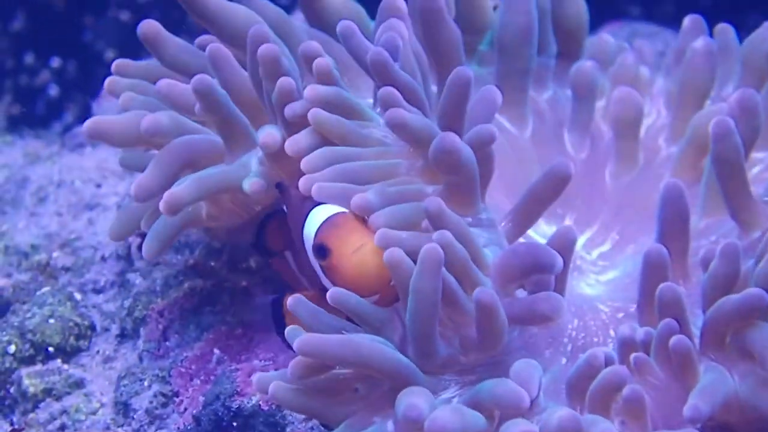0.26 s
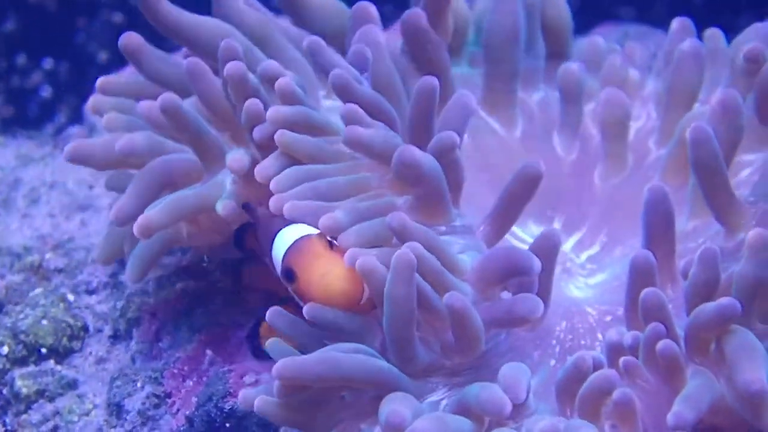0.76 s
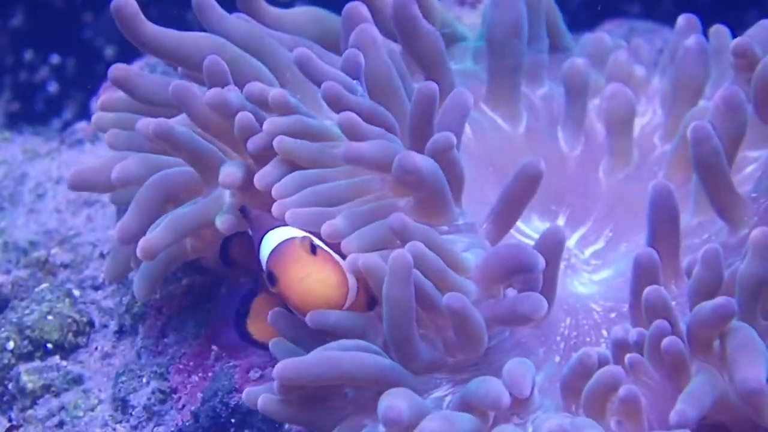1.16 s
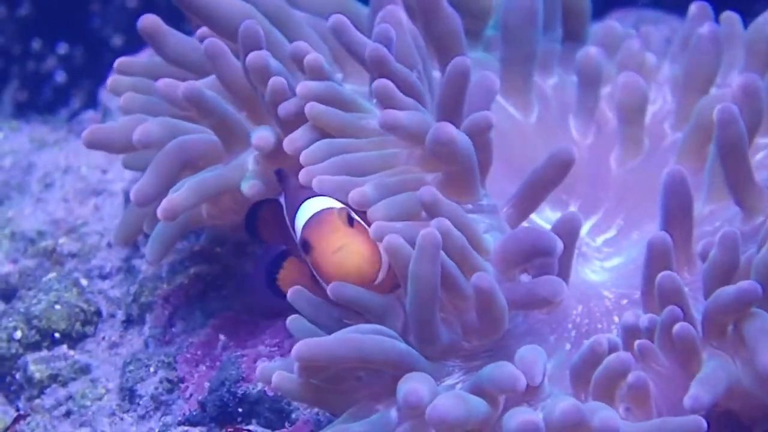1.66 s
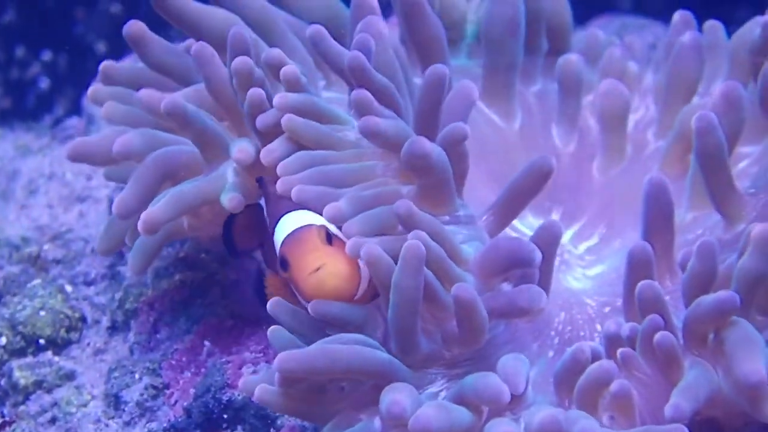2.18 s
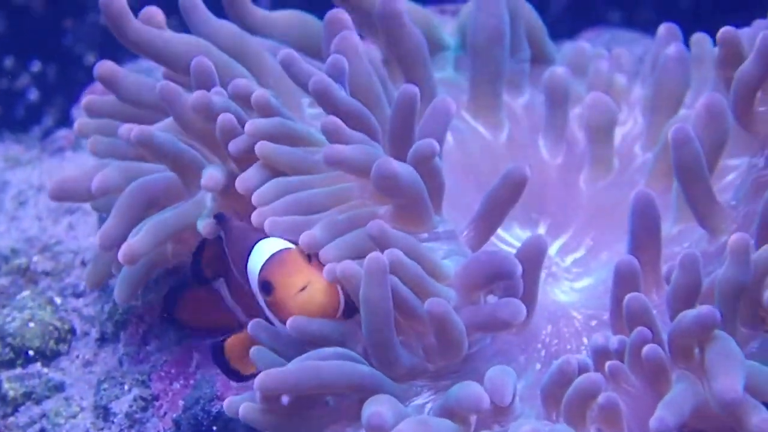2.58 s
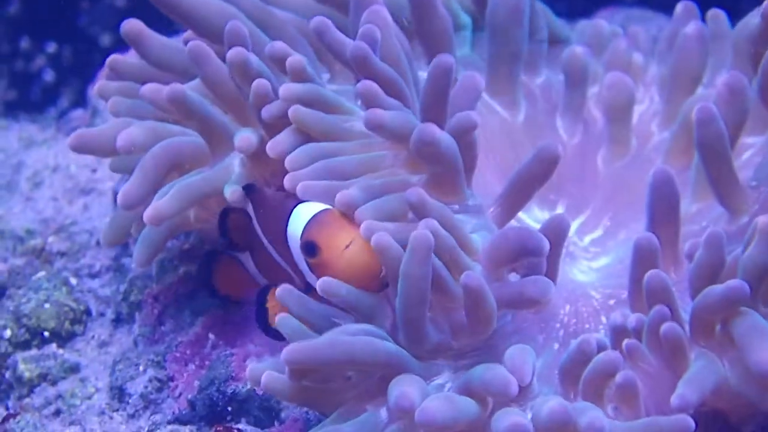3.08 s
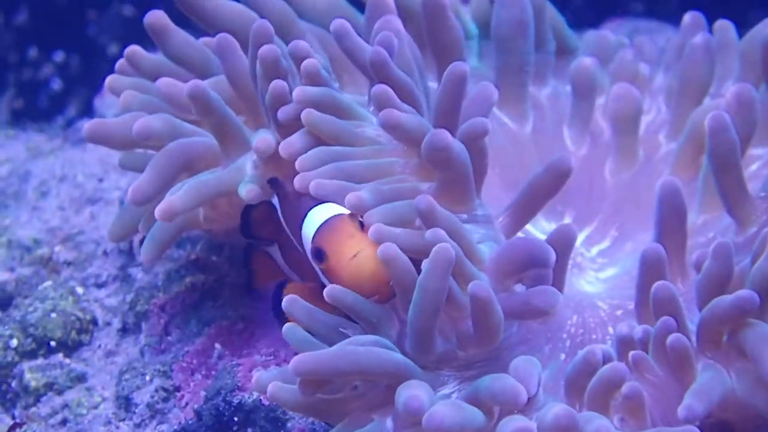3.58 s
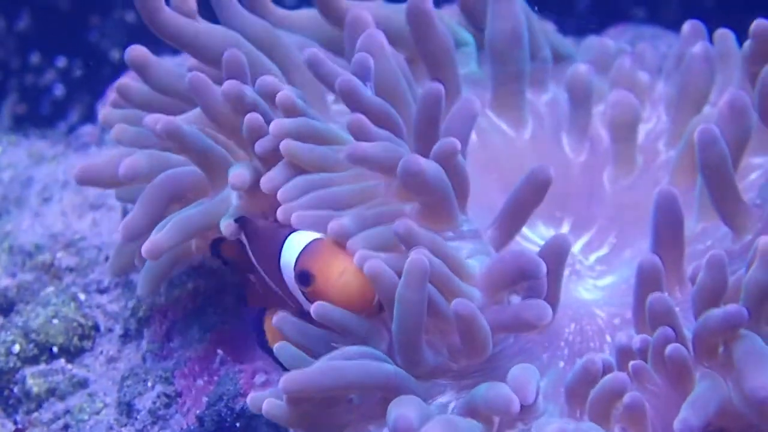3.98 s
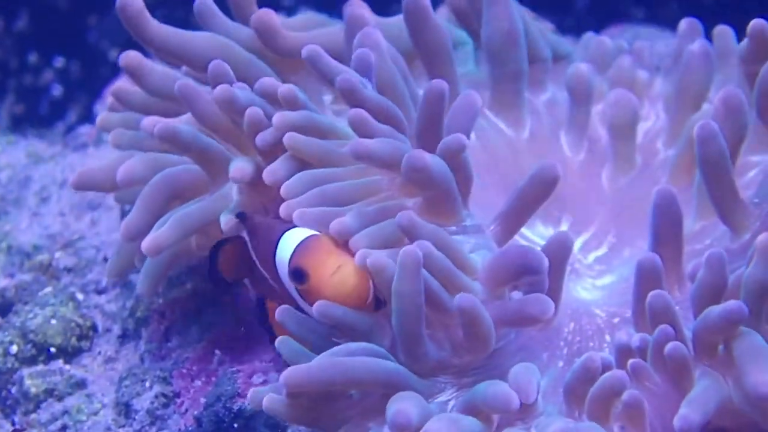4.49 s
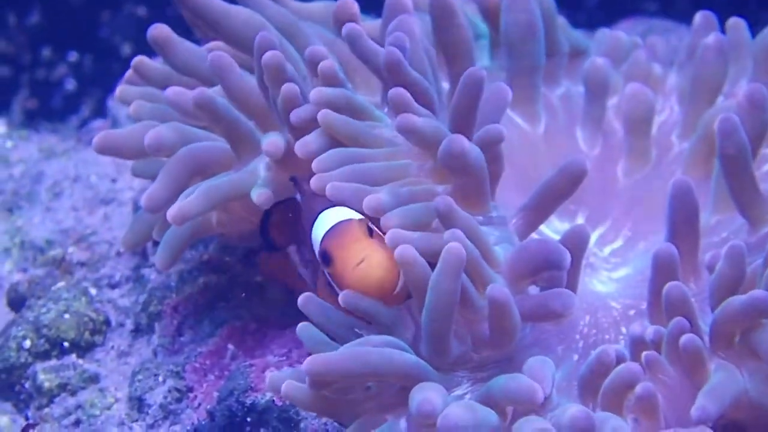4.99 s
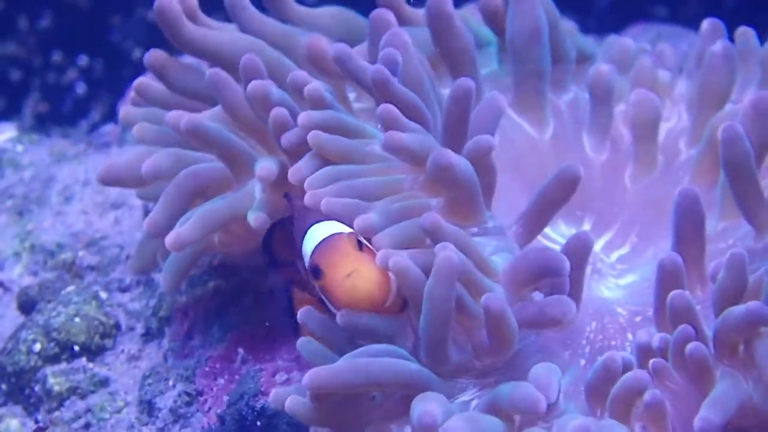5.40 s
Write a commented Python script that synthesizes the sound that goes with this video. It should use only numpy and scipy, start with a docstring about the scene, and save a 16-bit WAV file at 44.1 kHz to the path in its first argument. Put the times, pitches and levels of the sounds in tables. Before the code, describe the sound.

Close to a fish tank, a low pump hum swells and fades over murmuring water, with light ticks and soft handling bumps.

```python
"""Close to an aquarium tank: two pumps surge in pulse mode, one every 2 s, the other every 1.57 s.
Each hums at its rotor speed and churns water that rings the tank, over a murmur and microphone hiss.
A camera's lens drive ticks for the first 1.6 s, fingers knock and rub on its case,
and a few bubbles pop."""
import sys
import numpy as np
from scipy import signal
from scipy.fft import rfft, irfft
from scipy.io import wavfile

SR = 44100
rng = np.random.default_rng(int(sys.argv[2]) if len(sys.argv) > 2 else 0)


def wrap_up_sound(samples):
    """Save the sound to the file named by the first command line argument, as 16-bit audio."""
    columns = np.atleast_2d(samples).T
    # keep every value between -1 and 1, then stretch to whole-number steps
    tamed = np.clip(columns, -1, 1)
    steps = np.round(tamed * 32767).astype(np.int16)
    wavfile.write(sys.argv[1], SR, steps)


N = 249165
TIME_S = np.arange(N) / SR
RING_S = TIME_S[:SR // 8]
FREQ_HZ = np.maximum(np.arange(N // 2 + 1) * SR / N, 1)


def undb(db):
    """Decibels to gain."""
    return 10 ** (np.asarray(db) / 20)


def unit(x):
    """Scale to rms 1."""
    return x / np.sqrt(np.mean(x ** 2))


def pan(db):
    """Stereo gains of mean 1, left minus right = db."""
    gains = undb(np.array([[db], [-db]]) / 2)
    return gains / gains.mean()


def add(out, at_s, sound):
    """Mix a short sound in."""
    start = max(int(at_s * SR), 0)
    part = out[:, start:start + sound.shape[-1]]
    part += sound[..., :part.shape[1]]


def walk(rate_hz):
    """Smooth random wander, rms 1."""
    return unit(irfft(rfft(rng.standard_normal(N)) / (1 + (FREQ_HZ / rate_hz) ** 4), N))


def colour(points):
    """Gain curve from (frequency [Hz], level [dB]) points."""
    hz, db = np.transpose(points)
    return undb(np.interp(np.log(FREQ_HZ), np.log(hz), db))


def resonance(hz, width_hz):
    """Steep band-pass, gain 1 at the centre."""
    return 1 / (1 + 1j * (FREQ_HZ ** 2 - hz ** 2) / (FREQ_HZ * width_hz)) ** 2


def muffle(cutoff_hz):
    """Steep low-pass: water, glass and plastic pass little treble."""
    return 1 / np.sqrt(1 + (FREQ_HZ / cutoff_hz) ** 30)


def stereo_noise(gain, side_gain, balance=1):
    """Coloured mid/side noise, rms 1."""
    mid, side = rfft(rng.standard_normal((2, N))) * np.array([gain, gain * side_gain])
    return unit(irfft(np.array([(mid + side) * balance ** .5, (mid - side) / balance ** .5]), N))


def crackle(rate_hz, spread_db, response):
    """Random uneven jolts through a resonance, rms 1."""
    jolts = (rng.random(N) < rate_hz / SR) * rng.choice([-1, 1], N)
    sizes = undb(spread_db * rng.standard_normal(N))
    return unit(irfft(rfft(jolts * sizes) * response, N))


def blip(hz, swell_s):
    """Heavily damped ring; its envelope peaks at swell_s."""
    return -(RING_S / swell_s * np.exp(1 - RING_S / swell_s)) ** 2 * np.sin(2 * np.pi * hz * RING_S)


def surge(period_s, top_s, top_hz, climb_s, coast_s, lead_s, switch_on_s, trail_s,
          hum_db, churn_db, churn_db_per_hz):
    """Rotor speed, hum and churn levels; the pump runs from lead_s before top speed to trail_s after."""
    idle_hz, switch_off_s = 77.87, .06
    boom_hz, boom_half_width_hz = 108.4, 12.5  # speed that shakes the tank
    since_top_s = (TIME_S - top_s + period_s / 2) % period_s - period_s / 2
    glide_s = np.where(since_top_s < 0, climb_s, coast_s)
    rotor_hz = idle_hz + (top_hz - idle_hz) * np.exp(-abs(since_top_s) / glide_s)
    ramp = np.minimum((since_top_s + lead_s) / switch_on_s, (trail_s - since_top_s) / switch_off_s)
    resting = 1 - np.clip(ramp, 0, 1)
    boom_db = -20 * np.log10(1 + ((rotor_hz - boom_hz) / boom_half_width_hz) ** 2)
    flow_db = churn_db_per_hz * (rotor_hz - top_hz)
    return rotor_hz, hum_db + boom_db - 30.5 * resting, churn_db + flow_db - 13.5 * resting


def pump(drive, orders, tank, wobble_rad, flutter_db, churn_flutter_db, cutoff_hz, pane_db, fizz_db):
    """A rotor hums; the water it drives rings the tank and fizzes."""
    # churn width: (frequency [Hz], side minus mid [dB])
    side = [(110, -10), (400, -20.5), (750, -16.5), (2000, -12.5)]
    # pumps stand to the right: (frequency [Hz], left minus right [dB])
    balance = [(110, -7), (380, 0.5), (700, -4.5), (1300, -4.5), (2400, -3.5)]
    pane_hz, pane_half_width_hz = 353.6, 18.2  # front glass resonance
    rotor_hz, hum_db, churn_db = drive
    # eddies load the rotor unevenly: pitch and overtones waver
    phase = 2 * np.pi * np.cumsum(rotor_hz) / SR + wobble_rad * walk(13)
    hum = 0
    for k, db in orders:
        boost_db = pane_db / (1 + ((k * rotor_hz - pane_hz) / pane_half_width_hz) ** 2)
        hum += undb(db + boost_db + flutter_db * np.sqrt(k) * walk(13)) * np.sin(k * phase)
    modes = np.sqrt(sum(abs(undb(db) * resonance(hz, width_hz)) ** 2 for hz, width_hz, db in tank))
    churn = stereo_noise(modes * muffle(cutoff_hz), colour(side), colour(balance))
    fizz = undb(fizz_db) * crackle(rate_hz=140, spread_db=6.5, response=resonance(6360, 2640) ** 2)
    water = (churn + fizz) * undb(churn_db + churn_flutter_db * walk(30))
    return np.sqrt(2) * hum * undb(hum_db) + water


def murmur():
    """Circulating water, centred."""
    # water spectrum: (frequency [Hz], relative density [dB])
    spectrum = [(25, -24), (48, -5), (110, -8), (200, -12), (290, -5.5), (400, -10.5), (600, -13.5),
                (700, -32), (900, -32), (1150, -33), (1400, -40.5), (2000, -46.5), (2600, -61)]
    # stereo width: (frequency [Hz], side minus mid [dB])
    side = [(60, -5), (200, -18), (380, -16), (700, -2.5), (2400, -1.5)]
    return stereo_noise(colour(spectrum), colour(side)) * undb(-38 + 1.2 * walk(5.2))


def hiss():
    """Each microphone's own noise."""
    # noise floor: (frequency [Hz], relative density [dB])
    spectrum = [(2600, -31), (3500, -38), (4200, -47.5), (4800, -12.5), (5600, -4.5), (6500, 2), (7500, -4),
                (8600, 3), (9300, 1.5), (10700, -10.5), (15800, -9.5)]
    return stereo_noise(colour(spectrum), side_gain=1) * undb(-53) * pan(-0.59)


def lens(step_hz=15, step_count=24, whine_hz=3192, burst_s=0.02):
    """Each motor step whines briefly and jolts the barrel; the gears rustle."""
    # barrel modes: (frequency [Hz], level [dB], t60 [s])
    barrel = [(602.5, 10, 0.052), (714, 6, 0.035), (1130, -14.5, 0.048), (1460, -11.5, 0.021)]
    # hard jolts, slightly late: (time [s], level [dB])
    hard_steps = [(0.207, -12.5), (0.275, -16.5), (0.473, -14), (0.875, -20), (1.136, -21.5), (1.207, -20)]
    running = np.interp(TIME_S, [0, 1.2, 1.55, 1.6], [0.31, 0.61, 0.71, 0])
    out = stereo_noise(resonance(700, 300) * muffle(2000), 0.31) * undb(-43.5) * running  # gears
    gate = np.sin(np.pi * np.minimum(RING_S / burst_s, 1))
    phase = 2 * np.pi * whine_hz * RING_S
    whine = gate * (undb(-76) * np.sin(phase) + undb(-57.5) * np.sin(2 * phase))
    steps_s = .003 + np.arange(step_count) / step_hz
    steps_db = -24.5 + 2 * rng.standard_normal(step_count)
    for at_s, db in hard_steps:
        nearest = np.argmin(abs(steps_s - at_s))
        steps_s[nearest], steps_db[nearest] = at_s, db
    skew_rad = np.array([[.6], [-.6]])  # barrel rocks: microphones out of step
    for at_s, db in zip(steps_s, steps_db):
        ring = 0
        for hz, mode_db, t60_s in barrel:
            detuned_hz = hz * (1 + 0.056 * rng.standard_normal())
            decay = undb(mode_db - 60 * RING_S / t60_s)
            ring += decay * np.sin(2 * np.pi * detuned_hz * RING_S + skew_rad)
        ring *= 1 - np.exp(-(RING_S / 0.002) ** 2)
        add(out, at_s, undb(db - 2) * ring / abs(ring).max() * pan(1.6) + whine)
    return out


def knocks(thump_s=0.00514):
    """Fingers hit the case: a dull thump of about two cycles, a weak ring and, when hard, a crack."""
    # hits: (time [s], level [dB], ring [Hz], left minus right [dB], relative crack [dB])
    hits = [(0.561, -15.5, 424, 17, -34), (1.590, -9.5, 475, 31, -13.5), (1.613, -13.5, 418, 27, -29),
            (1.62, -14.5, 284, 26, -35), (1.645, -14, 240, 10, -32), (1.814, -5, 413, -7, -12),
            (4.449, -13, 320, 7.5, -42), (4.957, -19.5, 548, -28, -24), (5.060, -26, 590, 20, -28),
            (5.345, -19.5, 460, 23, -33), (5.375, -14, 503, 23.5, -22), (5.427, -14, 250, 10, -36),
            (5.440, -17.5, 520, -25, -28), (5.578, -16, 459, -26, -37), (5.595, -6, 398, -9.5, -12)]
    # crack spectrum: (frequency [Hz], level [dB])
    spectrum = [(450, -25.5), (700, 0), (870, 5.5), (1150, -11), (1450, -7), (1950, -14), (2400, -24),
                (3900, -30), (4600, -38), (7000, -65)]
    thumps, clicks = np.zeros((2, 2, N))
    push = np.sin(np.pi * np.minimum(RING_S / thump_s, 1))  # the finger damps the case at once
    tail = undb(-21) * blip(hz=365, swell_s=0.0036)
    for at_s, db, hz, pan_db, crack_db in hits:
        thump = tail - push * np.sin(2 * np.pi * hz * RING_S)
        add(thumps, at_s, undb(db) * thump * pan(pan_db))
        add(clicks, at_s + thump_s / 4, undb(db + crack_db) * pan(pan_db))
    crack = colour(spectrum) / colour(spectrum).mean()  # a click keeps its peak
    return irfft(rfft(thumps) * muffle(2010) + rfft(clicks) * crack, N)


def rubs():
    """Skin sticks and slips: small jolts ring the case, partly unlike at the two microphones."""
    # finger strokes: (start [s], end [s], level [dB], left minus right [dB])
    strokes = [(1.29, 1.63, -37.5, 6.5), (1.571, 1.674, -31, 19), (4.894, 5.15, -39.5, -0.5),
               (5.342, 5.4, -31, 29), (5.421, 5.47, -27.5, 4), (5.456, 5.619, -30, -6)]
    out = np.zeros((2, N))
    modes = resonance(400, 152) + undb(-9.5) * resonance(808, 126) + undb(-1) * resonance(206, 140)
    case = modes * muffle(1780)
    for start_s, end_s, db, pan_db in strokes:
        mid, side = (crackle(rate_hz=550, spread_db=4, response=case) for _ in range(2))
        window = np.sin(np.pi * np.clip((TIME_S - start_s) / (end_s - start_s), 0, 1)) ** .5
        out += (mid + undb(-1) * np.array([side, -side])) * window * undb(db) * pan(pan_db)
    return out


def pops(faint_count=14):
    """Surface bubbles: small ones tick, larger ones plip; a soft onset keeps each ring narrow."""
    # clearest bubbles: (time [s], level [dB], pitch [Hz], swell [s])
    clear = [(1.356, -26.5, 930, 0.0056), (1.364, -35, 6000, 0.00054), (2.231, -34, 850, 0.0026),
             (2.537, -28, 6650, .00027), (2.562, -36.5, 5800, 0.00065), (2.798, -32.5, 2800, .00009),
             (2.945, -35.5, 5980, 0.0009), (3.443, -34.5, 850, 0.002), (4.746, -34, 900, 0.0019)]
    faint = [(at_s, -45 + 2 * rng.standard_normal(), 5770 * 2 ** (0.13 * rng.standard_normal()), 0.00089)
             for at_s in rng.random(faint_count) * N / SR]
    out = np.zeros((2, N))
    for at_s, db, hz, swell_s in list(clear) + faint:
        onset = 1 - np.exp(-(RING_S / swell_s) ** 2)
        add(out, at_s, undb(db) * blip(hz, swell_s) * onset)
    return out


def scene():
    """Both pumps, the steady noise and the small close sounds."""
    # hum harmonics: (multiple of rotor speed, level [dB])
    big_orders = [(1, 0), (2, -14), (3, -11.5), (4, -16.5), (5, -20.5)]
    small_orders = [(1, 0.5), (2, -15.5), (3, -10.5), (4, -13.5)]
    # tank modes each pump rings: (frequency [Hz], width [Hz], level [dB])
    big_tank = [(174, 24, -0.5), (361.7, 79, 2.5), (489, 68, -8), (770, 370, -24), (1230, 210, -32.5),
                (1820, 650, -32)]
    small_tank = [(184, 130, -3.5), (386, 278, 4), (824, 70, -3), (1050, 270, -27), (1414, 197, -10),
                  (1674, 320, -18)]
    big_drive = surge(period_s=2, top_s=2.055, top_hz=122, climb_s=.32, coast_s=.44,
                      lead_s=.78, switch_on_s=.38, trail_s=.601,
                      hum_db=-31.5, churn_db=-34.2, churn_db_per_hz=.06)
    small_drive = surge(period_s=1.57, top_s=2.57, top_hz=110, climb_s=.48, coast_s=1.2,
                        lead_s=.433, switch_on_s=.05, trail_s=.45,
                        hum_db=-39, churn_db=-40, churn_db_per_hz=.2)
    big = pump(big_drive, big_orders, big_tank, wobble_rad=.09, flutter_db=1.5,
               churn_flutter_db=2, cutoff_hz=2216, pane_db=17, fizz_db=-35.5)
    small = pump(small_drive, small_orders, small_tank, wobble_rad=.33, flutter_db=1,
                 churn_flutter_db=2.46, cutoff_hz=2140, pane_db=5, fizz_db=-27)
    camera = lens() + knocks() + rubs()
    return big + small + camera + murmur() + hiss() + pops()


def record(dry):
    """Short fade at both ends, then a steep treble cut."""
    fade_s, cutoff_hz = .005, 15800
    fade = np.minimum(np.minimum(TIME_S, TIME_S[::-1]) / fade_s, 1)
    return signal.sosfilt(signal.ellip(10, .2, 80, cutoff_hz, fs=SR, output="sos"), dry * fade)


dry = scene()
out = record(dry)
wrap_up_sound(out)
```